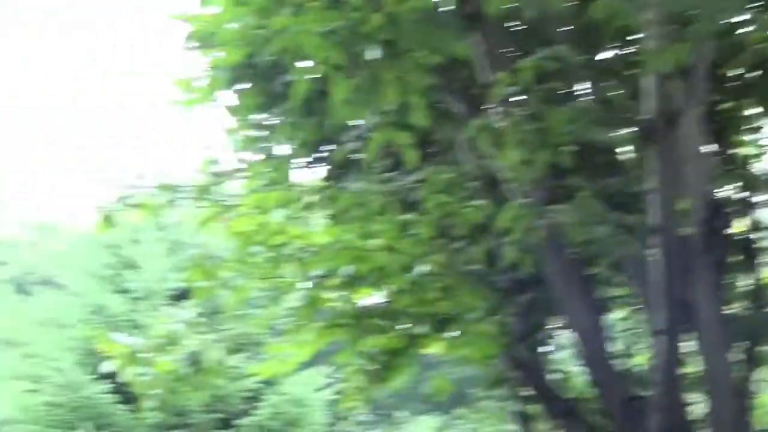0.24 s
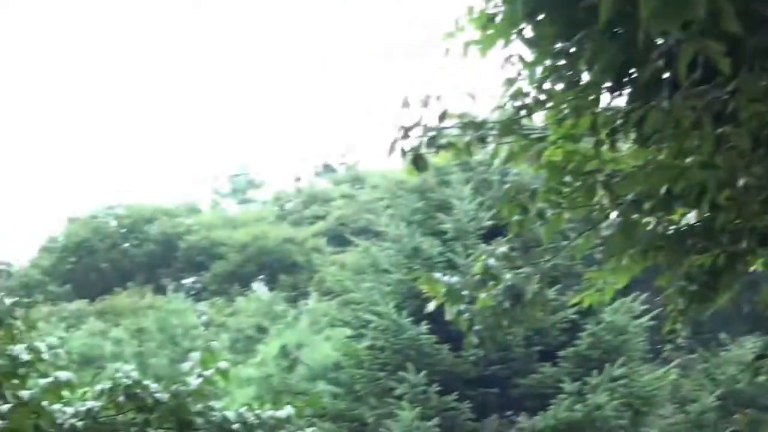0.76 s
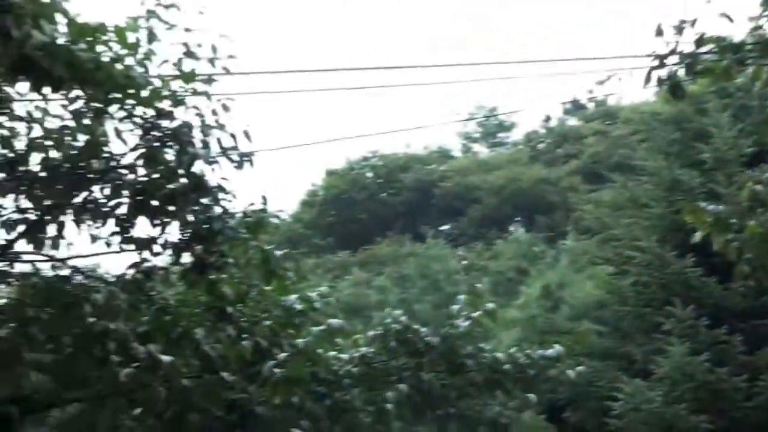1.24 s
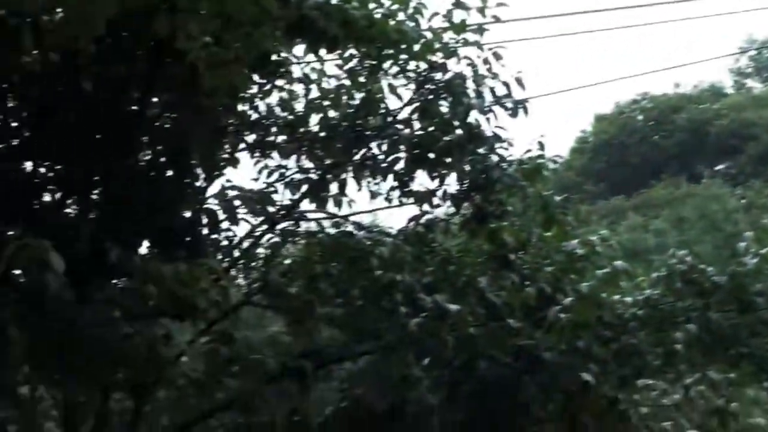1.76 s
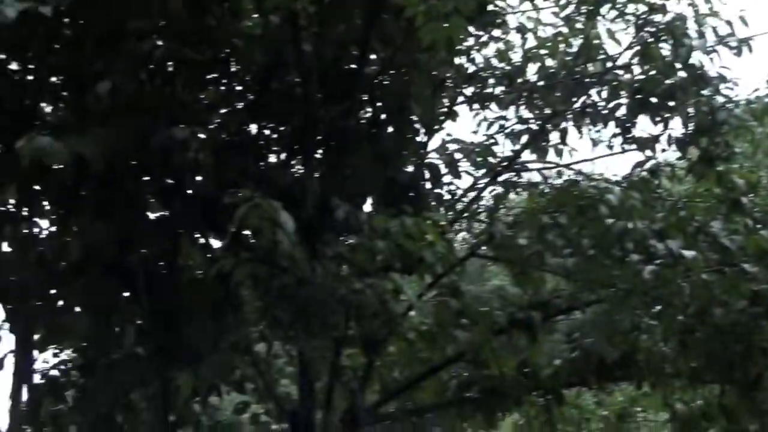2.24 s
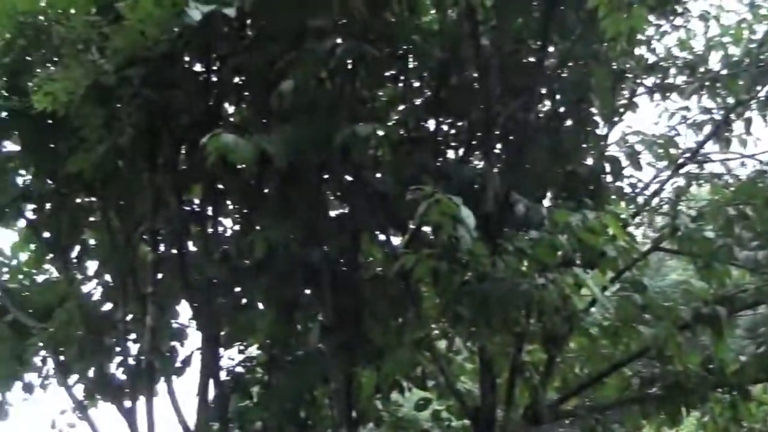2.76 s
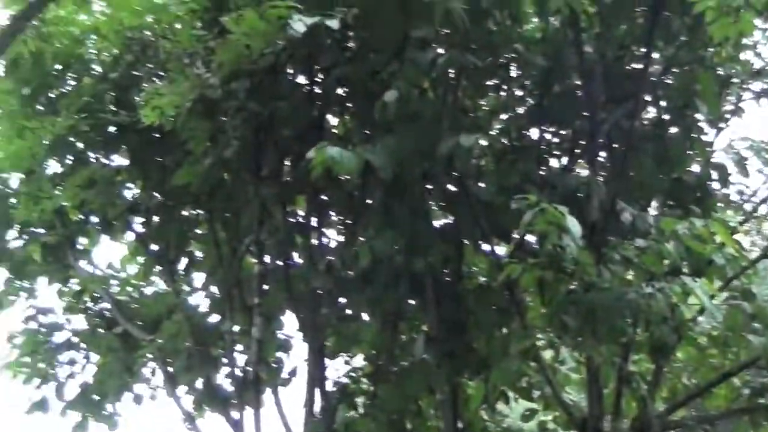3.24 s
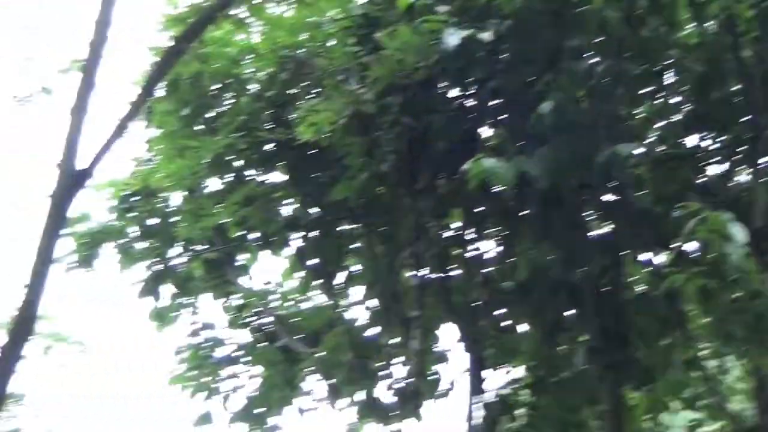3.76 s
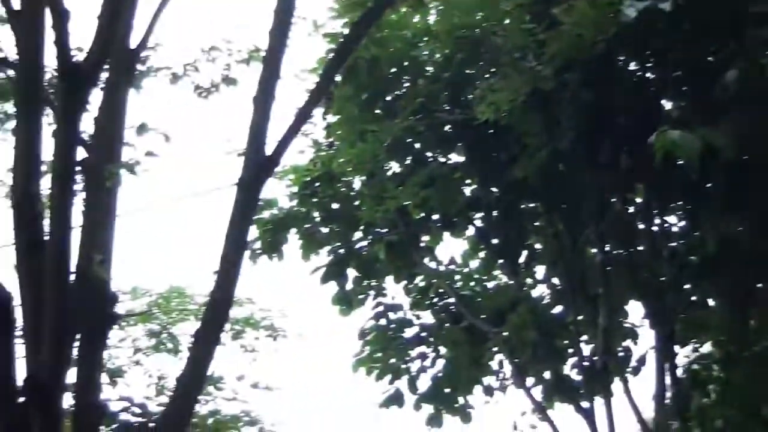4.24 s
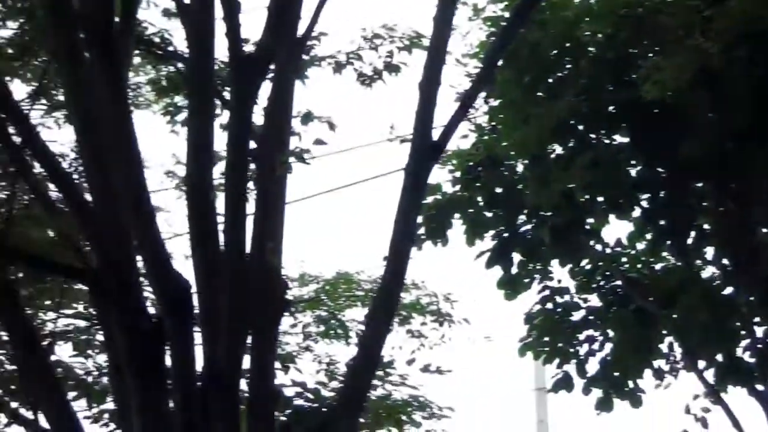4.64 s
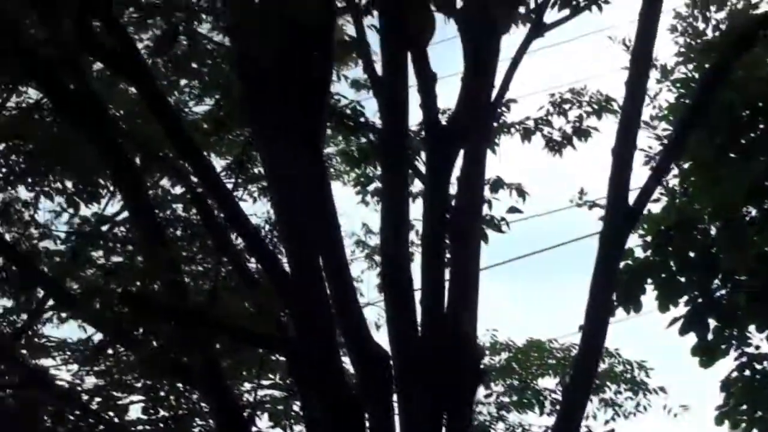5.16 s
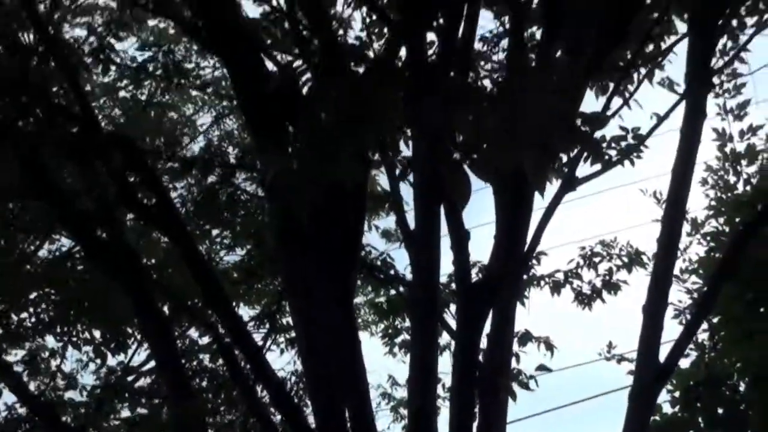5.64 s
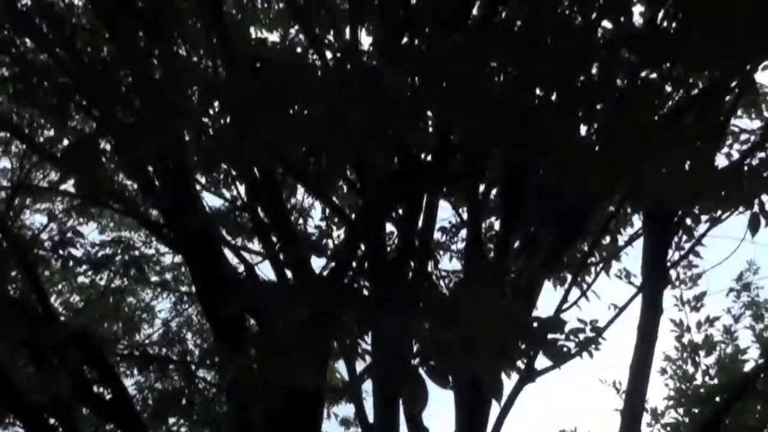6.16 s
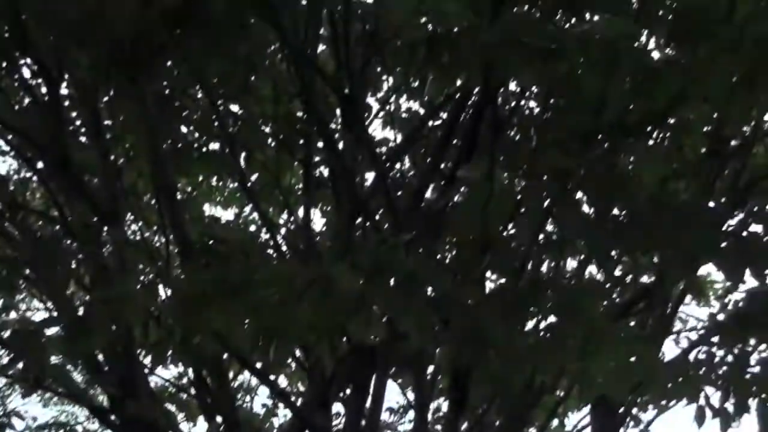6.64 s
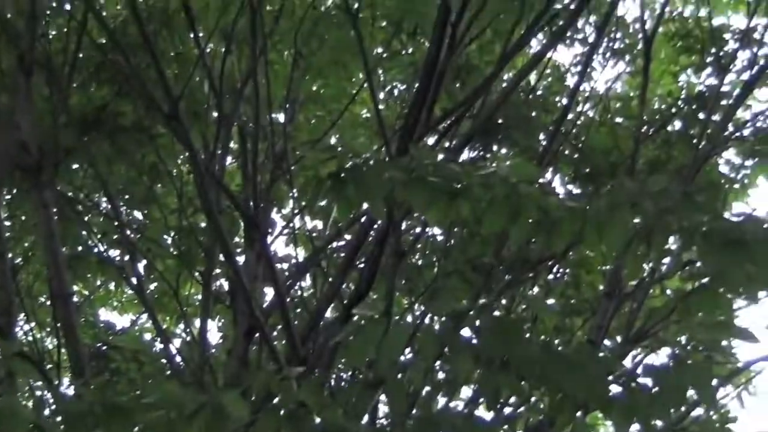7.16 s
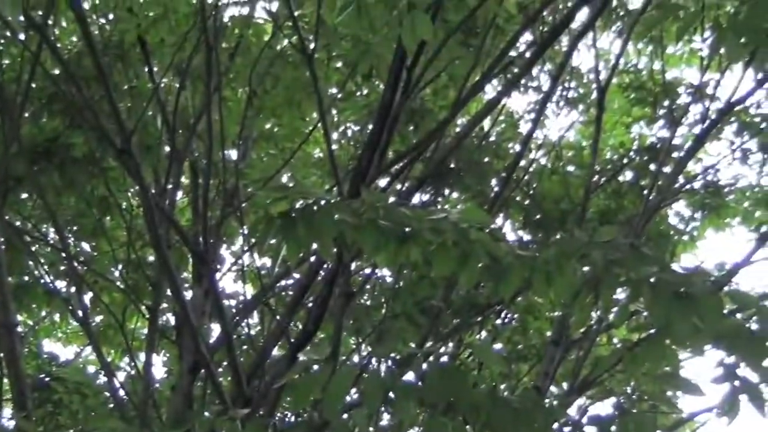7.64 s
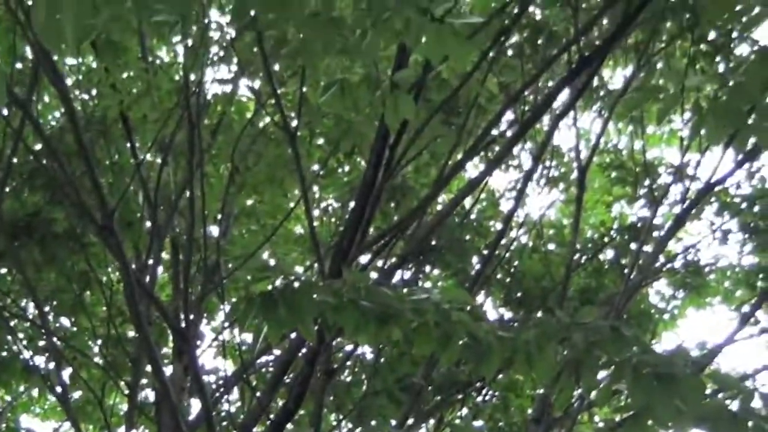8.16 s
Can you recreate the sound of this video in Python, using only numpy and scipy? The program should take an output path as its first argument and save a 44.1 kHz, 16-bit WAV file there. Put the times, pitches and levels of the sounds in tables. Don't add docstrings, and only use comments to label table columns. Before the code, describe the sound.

A shrill, rasping cicada chorus surrounds the listener, nasal whining swells alternating with bright sizzling, above farther cicadas and a very faint country hum.

```python
import sys
import numpy as np
from scipy import signal
from scipy.fft import rfft, irfft, next_fast_len
from scipy.io import wavfile
from scipy.ndimage import uniform_filter1d

SR = 44100
rng = np.random.default_rng(int(sys.argv[2]) if len(sys.argv) > 2 else 0)


def invert_db(x):
    u = np.asarray(x, float) / 20
    return 10 ** u


def file_out(sig):
    cols = np.atleast_2d(sig).T
    lim = np.clip(cols, -1, 1)
    pcm = np.round(lim * 32767).astype(np.int16)
    wavfile.write(sys.argv[1], SR, pcm)


N = 369999
CLOCK = np.arange(N) / SR


def tymbals(rate, rough):
    ribs = np.arange(4) * 0.098 + np.array([[0], [0.5]]) + rng.uniform(0, 0.03455, (2, 4))
    strength = np.outer([1, 0.7], 0.3 ** np.arange(4))
    order = np.arange(89)
    spectrum = strength.ravel() @ np.exp(-2j * np.pi * np.outer(ribs.ravel(), order))
    cycle = irfft((order > 0) * spectrum, 8192)
    turns = np.cumsum(rate) / SR + rng.random()
    clicks = evened(np.interp(turns % 1, np.arange(8192) / 8192, cycle))
    noise = evened((0.05 + abs(clicks)) * rng.standard_normal(len(rate)))
    rough = np.clip(rough, 0, 1)
    return np.sqrt(1 - rough) * clicks + np.sqrt(rough) * noise


def ramps(t, pumps, lead, rise, fall, lag, shape):
    start, length = np.transpose(pumps)[:2]
    end = start + length
    knots = np.array([start - lead, start + rise, np.maximum(end - fall, start + rise), end + lag])
    values = np.array([value * np.ones(len(start)) for value in shape])
    return np.interp(t, np.maximum.accumulate(knots.T.ravel()), values.T.ravel())


SNAP_S, DRIFT_HZ = 0.02, 0.4


def tymbal_rate(t, rates, pumps):
    s, resting, pumping = np.transpose(rates)
    pumped = ramps(t, pumps, SNAP_S, SNAP_S, SNAP_S, SNAP_S, [0, 1, 1, 0])
    drift = ramps(t, pumps, SNAP_S, SNAP_S, SNAP_S, SNAP_S, [1, 1, -1, -1])
    return np.interp(t, s, resting) + pumped * np.interp(t, s, pumping - resting) + DRIFT_HZ * drift


SWELL_S, FADE_S, SAG_DB = 0.049, 0.073, -1
HUSH_S, RETURN_S = 0.066, 0.085


def voices(t, pumps, leak_whine_db, leak_ring_db):
    start, length, whine_db, ring_db = np.transpose(pumps)[:4]
    next_start = np.append(start[1:], start[-1] + length[-1])
    rest = (start + length + next_start) / 2
    leak_whine, leak_ring = invert_db(leak_whine_db), invert_db(leak_ring_db)
    whine = ramps(t, pumps, 0, SWELL_S, FADE_S, 0, [leak_whine, 1, invert_db(SAG_DB), leak_whine])
    ring = ramps(t, pumps, 0, HUSH_S, 0, RETURN_S, [1, leak_ring, leak_ring, 1])
    whine_level = invert_db(np.interp(t, start + length / 2, whine_db))
    ring_level = invert_db(np.interp(t, rest, ring_db))
    return whine * whine_level, ring * ring_level


def body(x, modes, stretch=1):
    bands = [(-1) ** k * invert_db(db) * resonate(x, hz * stretch, width) for k, (hz, width, db) in enumerate(modes)]
    return evened(sum(bands))


# (frequency [Hz], width [Hz], level [dB])
DRONE_MODES = [(2735, 1415, -8), (3310, 1160, 1)]


def abdomen(drive, levels, modes, ring_modes, arch, drone_db, size=1):
    whine, ring = levels
    lag = np.exp(-1 / (0.025 * SR))
    opening = signal.lfilter([1 - lag], [1, -lag], whine) / invert_db(-29)
    stretch = size * (1 - arch * np.exp(-opening ** 2))
    effort = uniform_filter1d(np.hypot(whine, 0.7 * ring), 2000)
    drone = invert_db(drone_db) * effort * body(drive, DRONE_MODES)
    return whine * body(drive, modes, stretch) + ring * body(drive, ring_modes) + drone


# (frequency [Hz], width [Hz], level [dB])
WHINE_MODES = [(4000, 500, 1), (4600, 450, -1), (5100, 300, -6), (6600, 900, -8)]
RING_MODES = [(12180, 1930, -4), (13580, 1870, 4), (16500, 3240, -1.5)]
# (left minus right [dB], abdomen size [factor on whine frequency])
SEATS = [(2.5, 1.0), (3, 1.01), (1.8, .99), (-.3, 1.02), (2.2, 1.0), (.5, 1.0)]
# (first [dB], second [dB], third [dB], fourth [dB])
WHINE_WEIGHTS = [(-1, 0.5, 4, 1), (-3, -1, 10.5, 2.5), (0.5, 4.5, 8, 5), (-1, 2, 10, 7), (-0.5, 1.5, 13, 5),
                 (-3, -0.5, 11, 4)]
RING_HUSH = [-15, -15, -12, -9, -8, -8]
DRONE_LEVELS = [-14.5, -20.5, -13, -11, -15, -14]
# (time [s], rate at rest [Hz], rate in a pump [Hz])
RATE_A = [(0.0, 185.8, 186.8), (0.45, 185.8, 186.6), (0.9, 184.9, 186.0), (1.1, 184.0, 184.0),
          (1.35, 178.7, 178.7), (1.7, 169.1, 169.1), (1.87, 161.5, 161.5)]
RATE_B = [(0.1, 185.7, 186.8), (0.62, 185.6, 186.1), (0.75, 183.9, 185.0), (0.97, 182.2, 183.4),
          (1.2, 179.2, 179.8), (1.5, 174.3, 174.3)]
RATE_C = [(1.85, 177.3, 181.0), (2.3, 179.8, 182.8), (2.85, 182.9, 185.8), (3.5, 184.6, 187.0),
          (4.6, 185.4, 187.0), (5.6, 187.6, 188.6), (6.4, 187.0, 187.7), (7.6, 186.1, 185.8),
          (8.25, 181.0, 180.4)]
RATE_D = [(3.2, 196.7, 196.7), (3.6, 196.7, 196.7), (4.75, 194.5, 194.5), (4.9, 193.5, 193.5),
          (5.3, 187.8, 187.8), (5.84, 181.6, 181.6)]
RATE_E = [(4.45, 183.5, 183.6), (5.2, 184.3, 184.5), (5.75, 184.5, 185.2), (6.4, 184.6, 186.8),
          (7.1, 185.1, 186.5), (7.5, 184.2, 185.2), (8.1, 183.7, 185.4), (8.39, 182.0, 183.8)]
RATE_F = [(4.33, 175.5, 175.8), (4.7, 175.0, 177.5), (5.2, 174.3, 178.6), (5.7, 175.5, 179.1),
          (6.2, 177.0, 179.6), (6.7, 180.2, 179.9), (6.85, 180.2, 180.2)]
# (start [s], length [s], whine [dB], ring in the following rest [dB])
PUMPS_A = [
    (0.10, 0.2, -21.5, -25),
    (0.58, .22, -20.5, -53),
    (1.02, 0.257, -21.5, -29),
    (1.42, 0.426, -29, -29),
]
PUMPS_B = [
    (0.109, 0.19, -19, -24.5),
    (0.54, 0.15, -19.5, -19.5),
    (0.991, .22, -21.5, -26),
]
PUMPS_C = [(1.95, 0.19, -45, -37), (2.282, 0.15, -25, -30), (2.759, 0.14, -23, -28.5),
           (3.209, 0.15, -22.5, -20.5), (3.678, 0.2, -21, -21.5), (4.141, 0.14, -20.5, -21.5),
           (4.611, 0.23, -29.5, -45), (5.001, 0.2, -22, -26), (5.471, 0.24, -22, -25),
           (5.988, .19, -20.5, -24), (6.42, 0.27, -23, -32), (6.92, 0.24, -23, -25.5),
           (7.399, 0.23, -23, -28), (7.721, .16, -23.5, -24), (7.88, 0.348, -23.5, -42)]
PUMPS_D = [
    (3.221, 0.24, -21, -38),
    (4.24, 0.23, -28, -22.5),
    (4.61, 0.2, -26.5, -22),
    (5.00, 0.112, -22, -23.5),
    (5.43, 0.17, -24.5, -42),
]
PUMPS_E = [
    (4.481, 0.237, -23, -25),
    (5.44, 0.2, -24, -38),
    (5.91, 0.16, -20.5, -57),
    (6.331, .22, -21.5, -21.5),
    (6.799, 0.24, -20.5, -24),
    (7.229, .20, -20.5, -28),
    (7.67, .17, -19.5, -26.5),
    (8.12, 0.3, -21.5, -28),
]
PUMPS_F = [
    (4.359, 0.29, -27.5, -38),
    (4.87, .18, -20.5, -40),
    (5.361, 0.18, -19.5, -20.5),
    (5.85, 0.22, -22.5, -18),
    (6.339, 0.23, -22.5, -32),
]
CLIMB, CLIMB_S = 0.14, 0.08
SINK_PER_S = 0.38


def near_singers():
    out = np.zeros((2, N))
    all_rates = (RATE_A, RATE_B, RATE_C, RATE_D, RATE_E, RATE_F)
    all_pumps = (PUMPS_A, PUMPS_B, PUMPS_C, PUMPS_D, PUMPS_E, PUMPS_F)
    singers = zip(all_rates, all_pumps, SEATS, WHINE_WEIGHTS, RING_HUSH, DRONE_LEVELS)
    for rates, pumps, (pan_db, size), weights, hush_db, drone_db in singers:
        modes = [(hz, width, db + own) for (hz, width, db), own in zip(WHINE_MODES, weights)]
        on = slice(round(rates[0][0] * SR), round(rates[-1][0] * SR))
        t = CLOCK[on]
        rate = tymbal_rate(t, rates, pumps) + 0.1193 * wander(len(t), 0.0285)
        drive = scatter(tymbals(rate, rough=0.033), t60=0.036, wet_db=4, sway=2.2)
        sunk = 1 - SINK_PER_S * np.transpose(pumps)[1]
        sinking = ramps(t, pumps, 0, CLIMB_S, 0, SNAP_S, [1 - CLIMB, 1, sunk, 1 - CLIMB])
        levels = voices(t, pumps, -31.5, hush_db)
        song = abdomen(drive, levels, modes, RING_MODES, arch=0.061, drone_db=drone_db, size=size * sinking)
        song *= signal.windows.tukey(len(t), 0.03)
        out[:, on] += song * np.array([[1], [lean(pan_db)]])
    return out


# (frequency [Hz], width [Hz], level [dB])
FAR_WHINE_MODES = [(3995, 780, 2.5), (4840, 1120, 1), (6880, 1370, -3)]
FAR_RING_MODES = [(11780, 2070, -2.5), (12940, 3950, -5), (15600, 810, -10)]
# (start [s], length [s], whine [dB], ring in the following rest [dB])
FAR_PUMPS = [(0.114, 0.071, -25, -26.5), (0.59, 0.36, -27, -24.5), (1.054, 0.084, -27, -29.5),
             (1.454, .38, -21.5, -28.5), (1.86, 0.1, -19.5, -32.5), (2.31, 0.16, -23.5, -29.5),
             (2.754, 0.16, -24, -29), (3.235, 0.17, -27, -27), (3.76, 0.45, -28, -23.5),
             (4.142, .45, -29.5, -26), (4.97, .2, -24, -22.5), (5.441, 0.33, -27, -24.5),
             (5.923, 0.39, -30, -22.5), (6.392, 0.26, -29, -23.5), (6.879, 0.17, -26, -28),
             (7.346, 0.16, -25, -25.5), (7.759, 0.11, -27.5, -31), (8.141, 0.14, -22, -25)]
FAR_HUSH = [-2, -10, -10, -2, -8, -13, -10, -16, -2, -2, -3, -2, -2, -2, -3, -2, -2, -11]
# (time [s], size [factor on whine frequency])
FAR_SIZE = [(1.3, 1.0), (1.7, 0.9), (3.0, 0.91), (3.3, 0.92)]


def far_chorus(count=7):
    crowd = np.zeros(N)
    for hz in np.linspace(168, 203, count):
        singer = tymbals(hz + 2.5 * wander(N, 0.4), rough=0.7)
        crowd += singer * invert_db(2.75 * wander(N, 0.072))
    drive = scatter(crowd, t60=0.12, wet_db=6, sway=1.3)
    levels = voices(CLOCK, FAR_PUMPS, -1.5, FAR_HUSH)
    size = np.interp(CLOCK, *np.transpose(FAR_SIZE))
    return abdomen(drive, levels, FAR_WHINE_MODES, FAR_RING_MODES, arch=0.0039, drone_db=-8.5, size=size)


# (frequency [Hz], density [dB per Hz])
HUM_SPECTRUM = [(20, -6), (60, -6), (100, -7.5), (200, -0.5), (600, -3), (1000, -5.5), (1700, -9),
                (3000, -5.5), (8500, -8.5), (10300, -3.5), (12000, 4.5), (16000, -39)]
# (time [s], level [dB])
HUM_LEVEL = [(0, -46), (4.8, -43.5), (5.3, -47), (8.39, -46.5)]
# (time [s], frequency [Hz], level [dB])
MOANS = [
    [(.58, 616, -51), (.75, 615, -51), (.95, 614, -46)],
    [(3.98, 752, -47), (4.15, 645, -49.5), (4.55, 600, -60)],
    [(4.2, 920, -51), (4.35, 805, -49), (4.6, 800, -56)],
    [(4.68, 907, -54), (4.82, 974, -45), (4.95, 975, -62)],
]


def countryside():
    hum = evened(colour(rng.standard_normal(N), HUM_SPECTRUM))
    out = invert_db(np.interp(CLOCK, *np.transpose(HUM_LEVEL)) + 7.0) * hum
    for rows in MOANS:
        s, hz, db = np.transpose(rows)
        on = slice(round(s[0] * SR), round(s[-1] * SR))
        t = CLOCK[on]
        moan = evened(resonate(rng.standard_normal(len(t)), np.interp(t, s, hz), 71))
        out[on] += invert_db(np.interp(t, s, db) - 3) * moan * signal.windows.tukey(len(moan), 0.3)
    return out


def scatter(x, t60, wet_db, sway):
    t = np.arange(round(0.25 * SR)) / SR
    sparse = rng.standard_normal((2, len(t))) * (rng.random((2, len(t))) < 0.05)
    echoes = sparse * invert_db(-60 * t / t60)
    echoes = echoes / np.linalg.norm(echoes, axis=1)[:, None]
    paths = signal.oaconvolve(x[None], echoes, axes=1)[:, :len(x)]
    angle = 2 * np.pi * (sway * np.arange(len(x)) / SR + rng.random())
    wet = np.cos(angle) * paths[0] + np.sin(angle) * paths[1]
    return (x + invert_db(wet_db) * wet) / np.hypot(1, invert_db(wet_db))


def resonate(x, hz, width):
    turn = np.exp(2j * np.pi * np.cumsum(hz * np.ones(len(x))) / SR)
    r = np.exp(-np.pi * width / SR)
    return 2 * (turn * signal.lfilter([(1 - r) ** 2], [1, -2 * r, r * r], x / turn)).real


def colour(x, points):
    size = next_fast_len(x.shape[-1])
    f, db = np.transpose(points)
    gain = invert_db(np.interp(np.log(np.fft.rfftfreq(size, 1 / SR) + 1), np.log(f + 1), db))
    return irfft(rfft(x, size) * gain, size)[..., :x.shape[-1]]


def wander(count, seconds):
    span = round(seconds * SR)
    return evened(uniform_filter1d(uniform_filter1d(rng.standard_normal(count), span), span))


def evened(x):
    return x / np.sqrt(np.mean(x ** 2) + 1e-20)


def lean(db):
    return np.tanh(np.asarray(db) * np.log(10) / 40)


# (time [s], left minus right [dB])
TURN = [(0, 1.5), (2.5, 1.5), (3.2, 0), (6, .3), (8.39, 2)]
# (frequency [Hz], side minus mid [dB])
SPREAD = [(40, -33), (110, -21), (200, -19.5), (380, -13), (700, -4), (1290, -6), (2380, -14), (4400, -6),
          (7000, -8), (8500, -27), (10200, -1.5), (11300, -12.5), (12000, -23.5), (15000, -30.5)]


def scene():
    near, leaning = near_singers()
    far = far_chorus()
    mid = near + far + countryside()
    leaning = leaning + lean(np.interp(CLOCK, *np.transpose(TURN))) * far
    lead = np.gradient(near + far)
    echoes = scatter(mid, t60=0.15, wet_db=40, sway=2.3)
    side = colour(2.5 * leaning + 0.6 * lead + 0.75 * echoes, SPREAD)
    return np.array([mid + side, mid - side])


def band_limit(x):
    return signal.sosfilt(signal.butter(12, 17090, fs=SR, output="sos"), x)


def record(dry):
    low_pass = signal.firwin(1023, 15770, window=("kaiser", 9), fs=SR)
    mix = signal.oaconvolve(dry, low_pass[None], "same")
    return band_limit(mix)


dry = scene()
out = record(dry)
file_out(out)
```